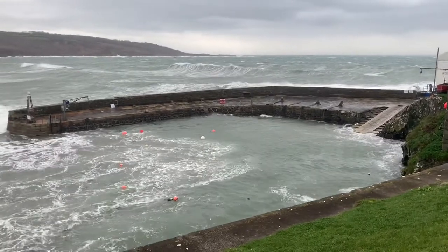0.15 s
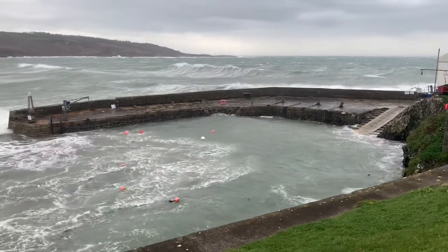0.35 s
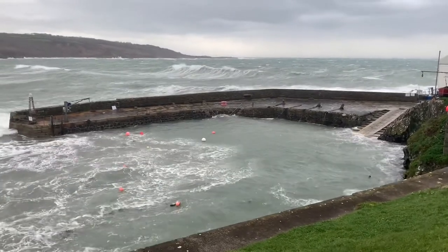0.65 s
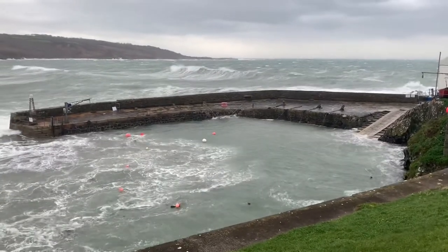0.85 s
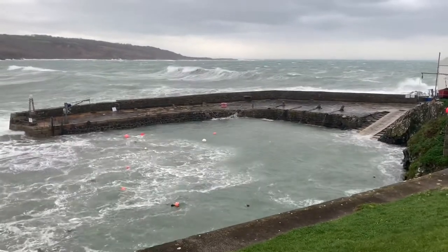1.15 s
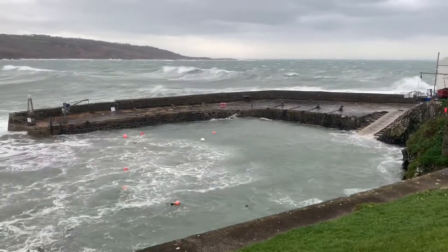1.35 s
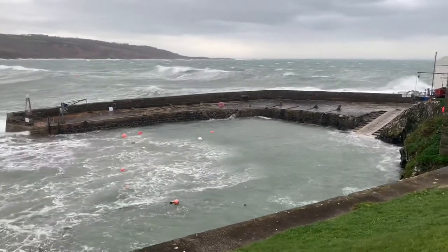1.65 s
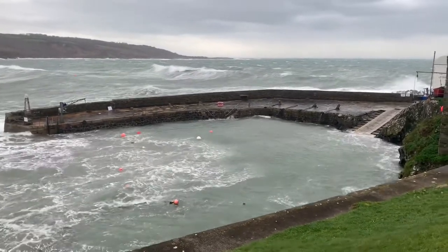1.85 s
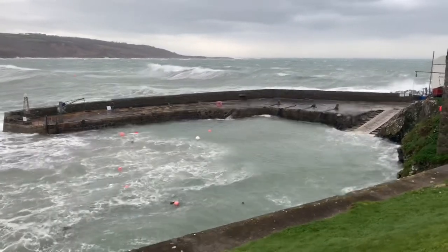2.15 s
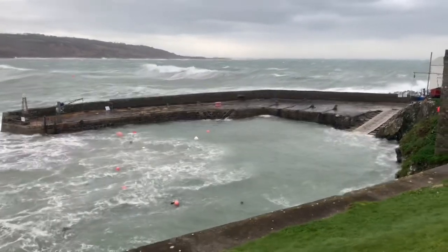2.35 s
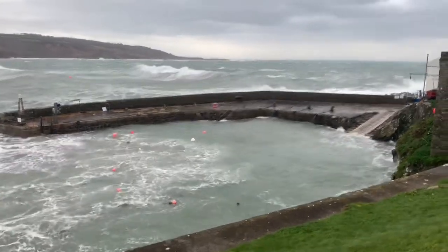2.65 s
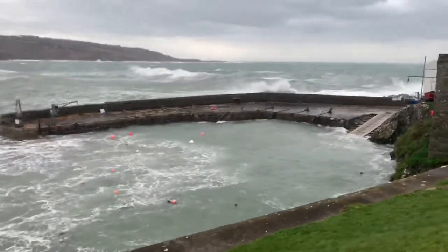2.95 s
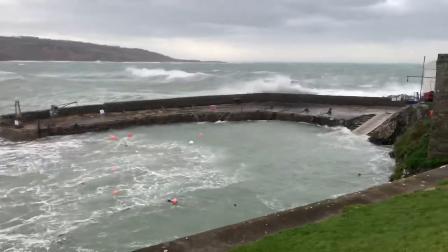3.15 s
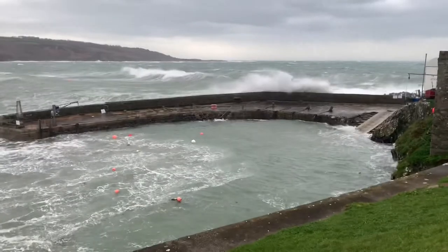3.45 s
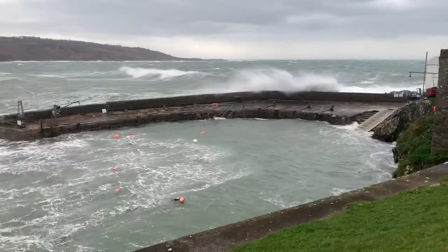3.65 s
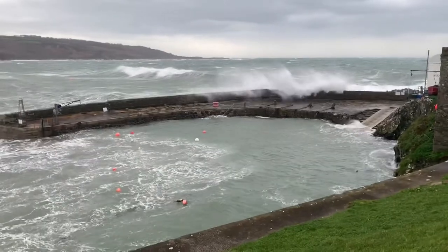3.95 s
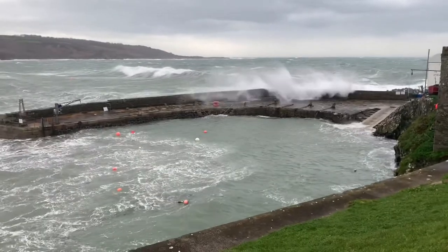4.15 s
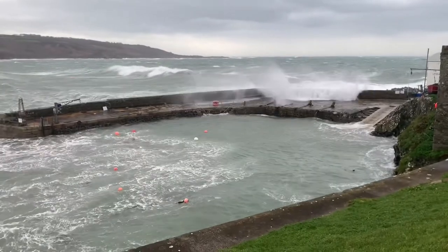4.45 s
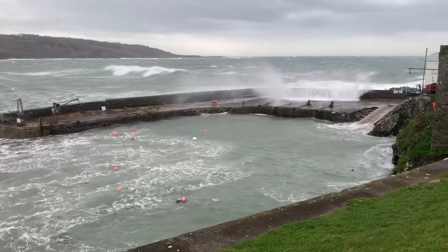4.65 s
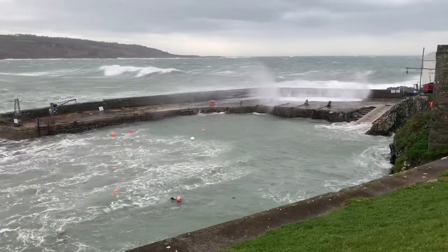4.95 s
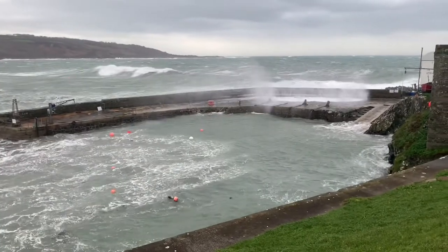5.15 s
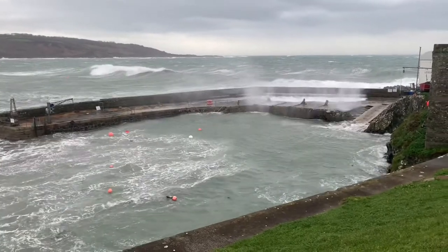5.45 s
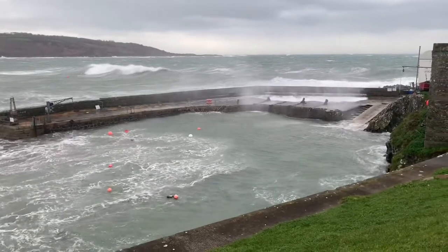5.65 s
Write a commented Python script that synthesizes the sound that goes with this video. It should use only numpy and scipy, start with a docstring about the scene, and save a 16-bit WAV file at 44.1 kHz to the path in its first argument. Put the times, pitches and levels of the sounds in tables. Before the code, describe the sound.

Storm wind buffets a microphone in a heavy low rumble, thumping and crackling hardest around two to three seconds, over a faint surf roar.

```python
"""Storm gusts batter a phone held above a small harbour. Noise bands for eddies of every size follow the
airflow as a heavy rumble that brightens with force; single eddies thump as short falling-pitch puffs.
The hardest gusts tear in ragged noise spurts and crackle in millisecond bursts. Underneath, noise of
shifting colour is the surf, ducked after the hardest gusts; brighter noise hisses as spray and swishes
as grass; gliding sines are thin whistles and the brief ring of a knock."""
import sys
import numpy as np
from scipy import signal
from scipy.fft import rfft, irfft
from scipy.io import wavfile
from scipy.ndimage import uniform_filter1d, minimum_filter1d

SR = 44100
rng = np.random.default_rng(int(sys.argv[2]) if len(sys.argv) > 2 else 0)


def wav_out(sig):
    """Save sig, one row per channel (or a flat mono array), as 16-bit PCM at SR to the path in sys.argv[1]."""
    wavfile.write(sys.argv[1], SR, np.round(np.clip(np.atleast_2d(sig).T, -1, 1) * 32767).astype(np.int16))


N = 256662
TIME = np.arange(N) / SR
SIDES = np.array([[1], [-1]])  # left, right


def undb(db):
    """Decibels to gain."""
    return 10 ** (np.asarray(db) / 20)


def unit(x):
    """Scale to rms 1."""
    return x / np.sqrt(np.mean(x ** 2))


def curves(rows):
    """Each column of a table as a control over time, joined by straight lines."""
    knot_s, *columns = np.transpose(rows)
    return [np.interp(TIME, knot_s, column) for column in columns]


def bins(size):
    """Frequencies of a transform of this size, in Hz, kept above zero."""
    return np.maximum(np.arange(size // 2 + 1) * SR / size, 1)


def colour(points, hz):
    """Gain of a spectrum table, interpolated over log frequency."""
    point_hz, db = np.transpose(points)
    return undb(np.interp(np.log(hz), np.log(point_hz), db))


def shape(x, points):
    """Filter by a spectrum table; rms 1."""
    return unit(irfft(rfft(x) * colour(points, bins(N)), N))


def walk(rate_hz):
    """Smooth random control that changes about rate_hz times a second; rms 1."""
    smooth = np.exp(-(bins(N) / rate_hz) ** 2)
    return unit(irfft(rfft(rng.standard_normal(N)) * smooth, N))


def bump(centre_s, half_width_s):
    """Bell-shaped swell in time."""
    return np.exp(-((TIME - centre_s) / half_width_s) ** 2 / 2)


def add(out, start_s, sound):
    """Mix a short sound in at start_s."""
    i = max(int(start_s * SR), 0)
    out[:, i:i + sound.shape[-1]] += sound[..., :N - i]


def two_ports(pair, split_hz=880):
    """Left and right from a shared and an opposed part: large eddies cover both ports, small strike each."""
    size = pair.shape[1]
    mid, side = rfft(pair)
    apart = 1 / (1 + (split_hz / bins(size)) ** 10)
    return irfft(mid + SIDES * apart * side, size)


def ports(size, split_hz=880):
    """Noise as the two ports take it."""
    return two_ports(rng.standard_normal((2, size)), split_hz)


LAG_CYCLES, LAG_LOW_HZ = 1.3, 77


def falling(hz):
    """Phase that delays slow swings of an eddy more than quick ones, so each puff falls in pitch."""
    return np.exp(-2j * np.pi * LAG_CYCLES * np.log(hz + LAG_LOW_HZ))


# running wind between gusts: time_s, force_db
FLOW = [(0, -53.5), (.44, -47), (.52, -37), (.93, -32), (1.27, -41), (1.6, -33), (1.75, -39), (1.82, -25.5),
        (2.08, -20), (2.3, -30), (2.5, -25.5), (2.7, -27.5), (3.0, -20), (3.17, -32), (3.23, -33),
        (3.35, -39), (3.8, -37), (4.1, -39.5), (4.32, -54.5), (4.5, -47), (4.64, -42.5), (5.4, -44),
        (5.63, -46.5), (5.82, -27)]
# gusts: start_s, length_s, force_db, extra_rumble_db, extra_body_db
GUSTS = [(0.064, 0.11, -46.5, -0.5, 7.5), (0.193, 0.098, -39.5, -1, -6), (0.586, .2, -30, -1.5, -3),
         (0.972, 0.22, -29, 0.5, 2.5), (1.33, 0.054, -32, 3, -6), (1.416, 0.13, -37, 2, 5.5),
         (1.853, 0.049, -14.5, -2, -2), (1.946, 0.091, -9, 6, 0.5), (2.144, 0.1, -29, -1.5, 0.5),
         (2.359, 0.1, -19, 1, 0.5), (2.536, 0.14, -15.5, -2, -1), (2.681, 0.14, -33, -5, 7.5),
         (2.908, 0.035, -20, 0.5, 0), (3.023, 0.1455, -14, 1, -2.5), (3.473, 0.14, -57, 3, 8.5),
         (3.875, 0.12, -30, -1, -1.5), (4.86, 0.19, -27, -1.5, -4), (5.147, 0.046, -47, 6, 3),
         (5.703, 0.21, -47, -6.5, 3.5)]
GUST_ATTACK_S, GUST_RELEASE_S = 0.013, 0.0076
# rumble grows with force up to a knee, then levels off
RUMBLE_TOP_DB, RUMBLE_KNEE_DB, RUMBLE_SLOPE = -10, -28.5, 0.98


def airflow():
    """Rumble, flutter and body controls in dB: each gust rises, holds and dies away over the running wind."""
    power, extra_db, body_db = undb(curves(FLOW)[0]) ** 2, 0, 0
    for start_s, length_s, force_db, heavy_db, full_db in GUSTS:
        attack = np.clip((TIME - start_s) / GUST_ATTACK_S, 0, 1)
        release = np.exp(-np.maximum(TIME - start_s - length_s, 0) / GUST_RELEASE_S)
        envelope = attack * release
        power = power + (undb(force_db) * envelope) ** 2
        extra_db = extra_db + heavy_db * envelope
        body_db = body_db + full_db * envelope
    below_knee_db = 10 * np.log10(1 + undb(RUMBLE_KNEE_DB) ** 2 / power)
    rumble_db = RUMBLE_TOP_DB - RUMBLE_SLOPE * below_knee_db + extra_db
    return rumble_db, 10 * np.log10(power), body_db


# air leaving the ports, some entries a slight lift instead: middle_s, half_width_s, change_db
LULLS = [(.44, 0.019, -11), (.79, 0.0087, -1), (.885, 0.0097, -8), (1.27, 0.029, -2.5), (1.4, 0.0096, -6),
         (1.69, 0.028, -1), (2.33, 0.037, 0.5), (2.86, 0.027, -1), (3.359, 0.015, -9), (3.655, 0.0061, -10),
         (4.17, 0.015, -2.5), (4.79, 0.039, -3.5), (5.09, 0.016, -2), (5.33, 0.02, -4), (5.55, 0.018, 1.5)]


def lulls():
    """Level changes in dB, mostly dips, between thumps."""
    return sum(change_db * bump(middle_s, width_s) for middle_s, width_s, change_db in LULLS)


# wind spectrum: freq_hz, relative_db
WIND_COLOUR = [(20, -28.5), (32, -19), (48, -4), (70, 1), (110, -3.5), (200, -4.5), (330, -8.5), (520, -15),
               (900, -25), (1500, -35), (2500, -47), (4500, -67.5), (9000, -70.5)]
LARGE_EDDY_SHARE = 0.62  # how far large eddies join the packets of the small ones


def wind(rumble_db, flutter_db, body_db, body_hz=480, body_octaves=1.0, flutter_trim_db=6,
         dull_hz=130, bright_hz=520, patchy_db=2.0, eddy_rate_hz=65, steady_s=0.065,
         brighten=0.054, strong_db=-20):
    """Eddies of every size; small ones come in stronger packets and grow fastest with the air speed."""
    hz, packets, out = bins(N), walk(eddy_rate_hz), 0
    pressure = rfft(shape(ports(N), WIND_COLOUR))
    for centre_hz in 20 * 2. ** np.arange(10):
        octave = np.maximum(1 - np.abs(np.log2(hz / centre_hz)), 0)
        band = irfft(pressure * octave, N)
        small = np.clip(np.log(centre_hz / dull_hz) / np.log(bright_hz / dull_hz), 0, 1)
        eddies = band * undb(min(small + LARGE_EDDY_SHARE, 1) * patchy_db * packets)
        # even out slow power changes: eddies share what the gust brings
        power = uniform_filter1d(np.mean(eddies ** 2, axis=0), int(steady_s * SR))
        eddies = eddies * np.sqrt(np.mean(band ** 2) / (np.abs(power) + 1e-18))
        db = (1 - small) * rumble_db + small * (flutter_db + flutter_trim_db)
        # faster air reaches further into the treble
        db = db + brighten * max(np.log2(centre_hz / bright_hz), 0) * (flutter_db - strong_db)
        # fuller or thinner middle per gust
        db = db + body_db * np.exp(-(np.log2(centre_hz / body_hz) / body_octaves) ** 2 / 2)
        out = out + eddies * undb(db)
    return out


# flap spectrum: freq_hz, relative_db
FLAP_COLOUR = [(150, 0.5), (400, 14), (800, 3.5), (1400, -14), (2200, -6.5), (3200, -32.5), (5000, -43),
               (9000, -53)]


def flaps(flutter_db, level_db=-8, rate_hz=70, spread_db=1.0, largest=3, merge_db=-25):
    """Small eddies snap past the ports at random, a swing or two each; level stops rising at merge_db."""
    pulses = np.zeros((2, N))
    chance = rng.random((1500, 3))
    at = (np.cumsum(-np.log(1 - chance[:, 0])) / rate_hz * SR).astype(int)
    size = undb(spread_db * np.minimum(-np.log(1 - chance[:, 1]), largest))
    # each snap meets the ports from its own angle
    angle = 2 * np.pi * chance[:, 2]
    snaps = size * np.array([np.cos(angle), np.sin(angle)])
    heard = at < N
    pulses[:, at[heard]] = snaps[:, heard]
    puffs = irfft(rfft(two_ports(pulses)) * falling(bins(N)), N)
    return shape(puffs, FLAP_COLOUR) * undb(np.minimum(flutter_db, merge_db) + level_db)


# single hard eddies: start_s, relative_db, pitch_hz, length_s
BUFFETS = [(0.122, -15.5, 556, 0.0092), (0.129, -7.5, 178, 0.022), (0.477, -21.5, 560, 0.018),
           (0.569, -23, 1000, 0.018), (0.591, -5, 86, 0.0077), (0.638, -23.5, 1110, 0.012),
           (0.69, -17, 820, 0.016), (0.754, -21, 1100, 0.0084), (0.83, -13, 1690, 0.0014),
           (0.833, 1.5, 294, 0.0074), (.837, -27, 1290, 0.0043), (0.9, -16, 600, 0.0048),
           (0.907, -6, 202, 0.006), (0.937, -13, 383, 0.0059), (0.973, -14, 394, 0.0056),
           (0.997, -2, 237, 0.012), (1.026, -16, 840, 0.0078), (1.06, -14, 830, 0.0048),
           (1.078, -18, 556, 0.0096), (1.109, -8, 380, 0.0035), (1.163, -14, 786, 0.0069),
           (1.174, -12.5, 765, 0.011), (1.267, -19, 420, 0.0052), (1.321, -19, 503, 0.0056),
           (1.351, -6.5, 193, 0.0099), (1.455, -11, 800, 0.0032), (1.564, -19, 1000, 0.0034),
           (1.567, -6, 247, 0.0039), (1.622, -10.5, 503, 0.0045), (1.789, -23, 930, 0.021),
           (1.806, -7, 128, 0.012), (1.833, -8.5, 750, 0.0097), (1.868, 2, 98, 0.019),
           (1.957, -1, 900, 0.0066), (1.982, 5.5, 670, 0.029), (2.037, -5, 800, 0.006),
           (2.082, -5, 524, 0.0076), (2.161, -7.5, 482, 0.014), (2.213, -21, 1500, 0.0039),
           (2.264, -9, 487, 0.0046), (2.381, -12, 430, 0.0082), (2.406, 2.5, 169, 0.0086),
           (2.445, 3, 794, 0.0063), (2.447, 4, 650, 0.0092), (2.464, 15, 480, 0.0047),
           (2.703, -5, 417, 0.012), (2.736, -10.5, 620, 0.0071), (2.755, -9.5, 560, 0.0094),
           (2.812, -22.5, 720, 0.006), (2.924, -5, 402, 0.0053), (3.125, -17, 1470, 0.015),
           (3.147, -14, 1110, .012), (3.151, 0, 390, 0.0093), (3.186, -6.5, 520, 0.0085),
           (3.295, -16, 630, 0.0057), (3.381, -9.5, 377, 0.0029), (3.449, -8.5, 400, 0.0079),
           (3.525, -16, 430, 0.0043), (3.588, -15.5, 520, 0.0063), (3.674, -15, 370, 0.0062),
           (3.732, -11, 328, 0.0034), (3.822, -11.5, 437, 0.0039), (3.912, -6, 594, 0.0045),
           (4.008, -10.5, 322, 0.0065), (4.075, -18, 446, 0.011), (4.104, -10, 615, 0.0016),
           (4.172, -9, 113, 0.01), (4.211, -7.5, 217, 0.0052), (4.592, -12.5, 260, 0.0051),
           (4.646, -11.5, 440, 0.0059), (4.685, -17.5, 383, 0.01), (4.804, -20, 623, 0.014),
           (4.854, -9.5, 660, 0.012), (4.866, -8.5, 240, 0.005), (4.88, -11, 710, 0.0069),
           (4.945, -8.5, 663, 0.0077), (4.985, -12.5, 1000, 0.028), (4.999, -27, 2150, 0.011),
           (5.001, -3, 1020, 0.0038), (5.003, -0.5, 504, 0.0067), (5.016, -2.5, 650, 0.0063),
           (5.163, -19, 517, 0.0067), (5.182, -14, 210, 0.0064), (5.262, -17, 457, 0.0043),
           (5.296, -21.5, 378, 0.01), (5.37, -21, 380, 0.016), (5.422, -22, 377, 0.0088),
           (5.468, -16.5, 322, 0.007), (5.579, -6.5, 188, 0.0073), (5.66, -15.5, 307, 0.0096),
           (5.697, -12, 465, 0.013), (5.726, -14, 570, 0.0073), (5.777, -11, 530, 0.013)]
BUFFET_RISE_S = .001


def buffets(level_db=-7, slope=3.86):
    """A hard eddy hits at once and dies away in a few ever slower swings of pressure."""
    out, size = np.zeros((2, N)), 8192
    t, hz = TIME[:size], bins(size)
    for start_s, db, pitch_hz, length_s in BUFFETS:
        ratio = hz / pitch_hz
        swings = irfft(rfft(ports(size)) * ratio / (1 + ratio ** (slope + 1)), size)
        push = (1 - np.exp(-t / BUFFET_RISE_S)) * np.exp(-(t / length_s) ** 2 / 2)
        puff = irfft(rfft(swings * push) * falling(hz), size)
        lag_s = LAG_CYCLES / (pitch_hz + LAG_LOW_HZ)  # start early by the delay at the pitch
        add(out, start_s - lag_s, unit(puff) * np.std(push) * undb(db + level_db))
    return out


# air tearing off the case edge: start_s, length_s, relative_db, left_over_right_db
TEARS = [(0.678, 0.027, -48, 2), (0.83, 0.013, -36.5, -5), (1.854, 0.069, -34.5, 1.5),
         (1.972, 0.049, -17.5, 0), (2.161, 0.014, -39.5, -2), (2.445, 0.018, -25.5, 0),
         (2.548, 0.054, -30.5, 0.5), (2.635, 0.18, -48.5, 0), (2.972, 0.015, -38, 3),
         (3.043, 0.12, -31.5, 0), (4.999, 0.019, -40, 1)]
# tear spectrum: freq_hz, relative_db
TEAR_COLOUR = [(600, -6), (1400, 14), (2400, 2.5), (3500, -3), (5000, -16), (6500, -18.5), (8000, -44),
               (11500, -37.5), (15500, -48)]
TEAR_RISE_S, TEAR_FALL_S = 0.014, 0.018
SPURTS_PER_S, SPURT_DB = 170, 13


def tearing(level_db=2, ragged_db=0.5, rate_hz=260, spurt_decay_s=0.0026):
    """Flow breaks away from the case in ragged spurts that start at once and die within milliseconds."""
    force = 0
    for start_s, length_s, db, left_db in TEARS:
        early_s = np.maximum(start_s - TIME, 0)
        late_s = np.maximum(TIME - start_s - length_s, 0)
        envelope = np.exp(-early_s / TEAR_RISE_S - late_s / TEAR_FALL_S)
        force = force + undb(db + level_db + SIDES * left_db / 2) * envelope
    starts = rng.random(N) < SPURTS_PER_S / SR
    decay = np.exp(-1 / (spurt_decay_s * SR))
    spurts = signal.lfilter([1], [1, -decay], starts * rng.random(N))
    ragged = undb(ragged_db * walk(rate_hz)) * (1 + undb(SPURT_DB) * spurts)
    return shape(ports(N) * ragged, TEAR_COLOUR) * force


# sharp cracks of air on the ports: start_s, relative_db, left_over_right_db
CRACKS = [(.637, -42, 3), (.7, -41, 1), (.768, -41.5, 3), (0.829, -24, 6.5), (1.029, -46, 1),
          (1.062, -41, 5), (1.456, -39.5, 4), (1.558, -38, 4), (1.623, -40, 4), (1.917, -38.5, -1),
          (1.93, -28.5, 4.5), (1.946, -30, 15), (2.017, -8, 5.5), (2.164, -34.5, 4.5), (2.215, -41.5, 4),
          (2.441, -23.5, 6), (2.454, -26.5, 1.5), (2.465, -18.5, 5), (2.55, -23.5, 4), (2.571, -24.5, 17),
          (2.577, -17, 1.5), (2.583, -22.5, 7), (2.598, -23.5, -5), (2.611, -25, 4), (2.66, -31.5, 4.5),
          (2.782, -40, 4), (2.876, -40, -1), (2.979, -37, 5), (3.008, -32.5, 0), (3.061, -19, 2.5),
          (3.085, -18.5, -0.5), (3.105, -23, -2), (3.117, -22, 2), (3.903, -35.5, -5), (5.002, -32.5, 3)]
# crack spectrum: freq_hz, relative_db
CRACK_COLOUR = [(600, -20.5), (1500, 19), (2800, 5.5), (5000, -6.5), (8000, -15), (11500, -12),
                (15500, -32.5)]


def cracks(level_db=-1, decay_s=0.0025):
    """Sharpest spurts: noise bursts dying in milliseconds, mostly louder at the windward left port."""
    out, t = np.zeros((2, N)), TIME[:SR // 20]
    for start_s, db, left_db in CRACKS:
        add(out, start_s, ports(len(t)) * np.exp(-t / decay_s) * undb(db + level_db + SIDES * left_db / 2))
    return shape(out, CRACK_COLOUR) * np.std(out)


# roar regions that swell and sink on their own: centre_hz
WASH_HZ = [500, 800, 1230, 1900, 2800]


def wash(surf, shift_db, rate_hz, octaves=0.14):
    """Each region of the roar swells and sinks on its own as breakers come and go."""
    spectrum, out = rfft(surf), surf
    for centre_hz in WASH_HZ:
        region = np.exp(-(np.log2(bins(N) / centre_hz) / octaves) ** 2 / 2)
        band = irfft(spectrum * region, N)
        out = out + band * (undb(shift_db * walk(rate_hz)) - 1)
    return out


# roar and spray levels as they reach the ear, the roar ducked by the recorder after the hardest gusts:
# time_s, roar_relative_db, spray_relative_db
SEA = [(0, 5, 2), (1.7, 8, 7), (2.4, -8, 8.5), (2.8, -10, 1), (3.35, 3, 2), (4.1, 7.5, 5.5), (4.35, 9, 7.5),
       (4.52, 11.5, 6.5), (4.8, 7.5, 7), (5.4, 8, 10), (5.82, 5, 11.5)]
# surf spectrum: freq_hz, relative_db
ROAR_COLOUR = [(60, 21.5), (200, -12.5), (500, 3), (900, 1), (1400, -4), (2100, -4.5), (2800, -11.5),
               (3600, -18.5), (5000, -45), (8000, -47.5)]
# spray spectrum: freq_hz, relative_db
SPRAY_COLOUR = [(2000, -2), (4000, 9), (6300, 0), (8300, -0.5), (10300, 10.5), (12000, 3), (13500, -10.5),
                (15500, 2.5)]
ROAR_DB, SPRAY_DB = -44.5, -64.5  # base levels


def sea(churn_db=1.0, fizz_db=1, spray_width=1.13, wide_db=-15, shift_db=1.6, shift_rate_hz=12):
    """Breakers merge into a wide roar of shifting colour; blown spray hisses above it."""
    roar_db, spray_db = curves(SEA)
    spread = ports(N, split_hz=1060) + undb(wide_db) * SIDES * rng.standard_normal(N)
    surf = wash(shape(spread, ROAR_COLOUR), shift_db, shift_rate_hz)
    roar = surf * undb(ROAR_DB + roar_db + churn_db * walk(24))
    mid, side = rng.standard_normal((2, N))
    hiss = shape(mid + spray_width * SIDES * side, SPRAY_COLOUR)
    spray = hiss * undb(SPRAY_DB + spray_db + fizz_db * walk(10))
    return roar + spray


# swishes of wind through grass: peak_s, half_width_s, relative_db
GRASS = [(.28, 0.21, -51), (1.42, 0.031, -52), (4.1, 0.31, -57.5), (5.1, .1, -49.5), (5.8, 0.34, -51.5)]
# grass spectrum: freq_hz, relative_db
GRASS_COLOUR = [(1500, 5.5), (2800, 1), (4000, 0.5), (5200, -10), (6300, -2), (7300, -9), (9000, -35),
                (15000, -46)]
FLURRY_DB = .7


def grass():
    """Countless blades brush each other in flurries that swell and fade."""
    swell = sum(undb(db) * bump(peak_s, width_s) for peak_s, width_s, db in GRASS)
    return shape(rng.standard_normal((2, N)), GRASS_COLOUR) * swell * undb(FLURRY_DB * walk(18))


# thin whistles and the brief ring of a knock, before waver: start_s, length_s, start_hz, end_hz, peak_db
WHISTLES = [(0, 0.13, 1114, 1120, -48), (.28, 0.37, 1474, 1525, -53.5), (0.826, 0.0057, 1390, 1520, -17),
            (1.009, 0.063, 11400, 10950, -53.5), (1.424, .05, 10300, 10350, -64),
            (1.47, .07, 10950, 10850, -63), (1.737, 0.16, 8850, 9250, -63)]


def whistles_and_ring(waver=0.0032):
    """Thin whistles and the brief ring of a knock: gliding sine tones, slightly unsteady in pitch."""
    out, drift = np.zeros((2, N)), 1 + waver * walk(120)
    for start_s, length_s, start_hz, end_hz, db in WHISTLES:
        u = np.linspace(0, 1, int(length_s * SR))
        hz = (start_hz + (end_hz - start_hz) * u) * drift[int(start_s * SR):][:len(u)]
        tone = np.sin(2 * np.pi * np.cumsum(hz) / SR)
        add(out, start_s, tone * np.sin(np.pi * u) * undb(db))
    return out


THROB_DB, THROB_RATE_HZ = 2, 12.7  # random throb of the rumble


def scene():
    """Wind on the ports over the sea."""
    rumble_db, flutter_db, body_db = airflow()
    calm_db = lulls()
    throbbing_db = rumble_db + calm_db + THROB_DB * walk(THROB_RATE_HZ)
    gusts = wind(throbbing_db, flutter_db + calm_db, body_db) + flaps(flutter_db)
    return gusts + buffets() + tearing() + cracks() + sea() + grass() + whistles_and_ring()


def record(dry, ceiling=0.97, bass_hz=36, top_hz=15800):
    """The microphone sheds the deepest bass, a fast limiter holds the peaks, the top is cut."""
    high_pass = signal.butter(3, bass_hz, "high", fs=SR, output="sos")
    sound = signal.sosfilt(high_pass, dry)
    size = SR // 150  # limiter window, samples
    headroom = np.minimum(1, ceiling / (np.abs(sound).max(axis=0) + 1e-9))
    gain = uniform_filter1d(minimum_filter1d(headroom, size), size)
    low_pass = signal.ellip(8, .2, 70, top_hz, fs=SR, output="sos")
    return signal.sosfilt(low_pass, sound * gain)


dry = scene()
out = record(dry)
wav_out(out)
```